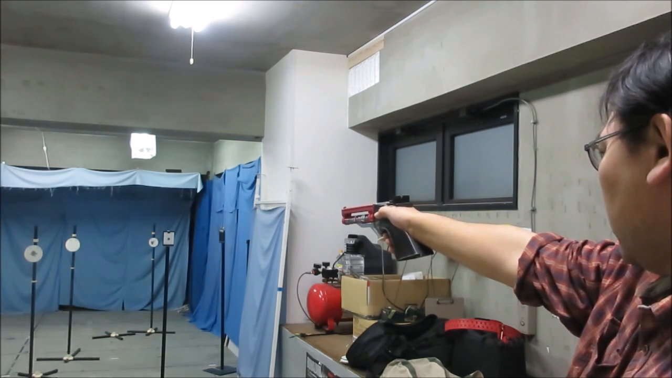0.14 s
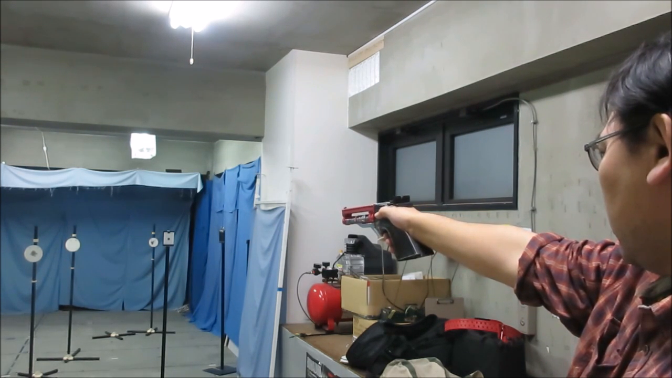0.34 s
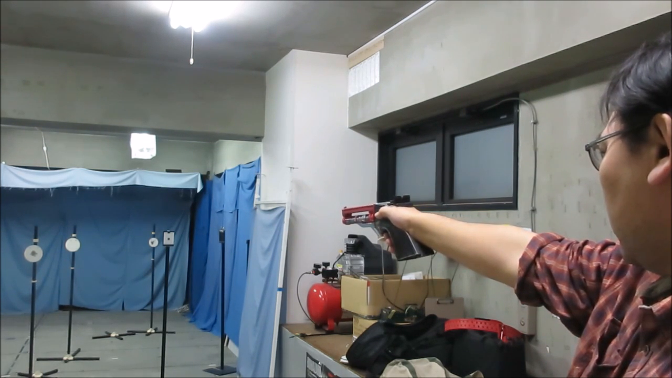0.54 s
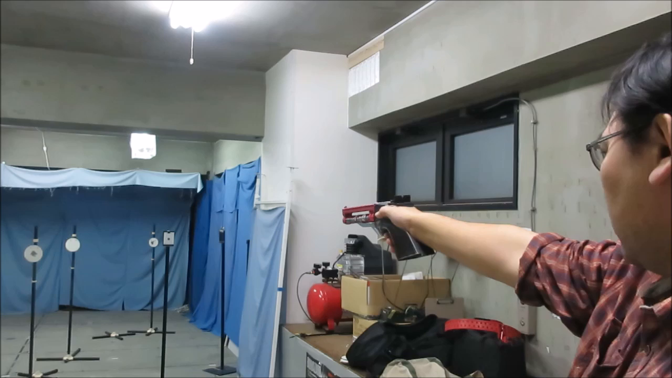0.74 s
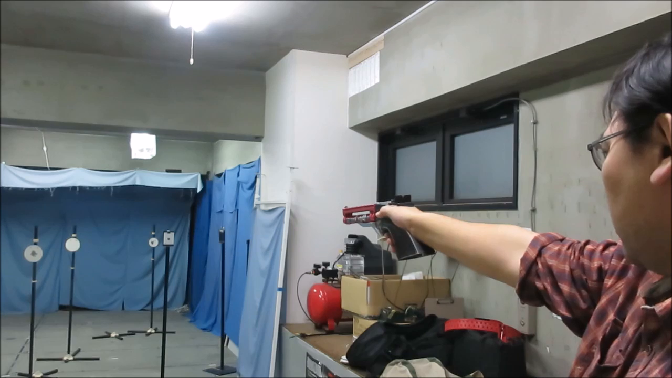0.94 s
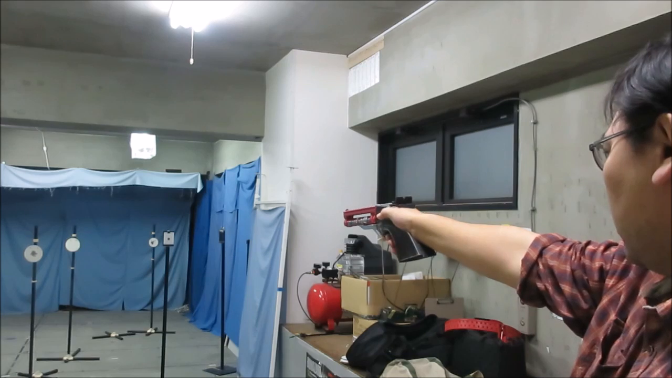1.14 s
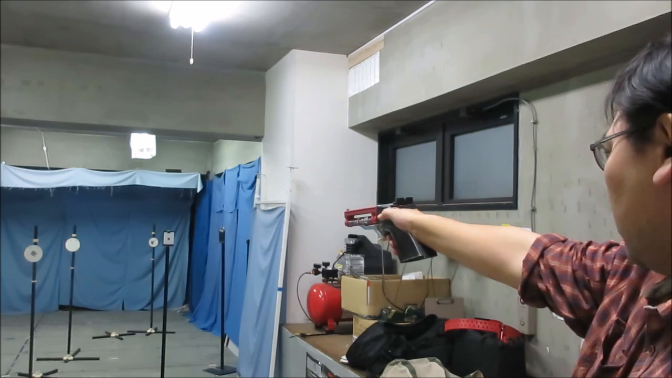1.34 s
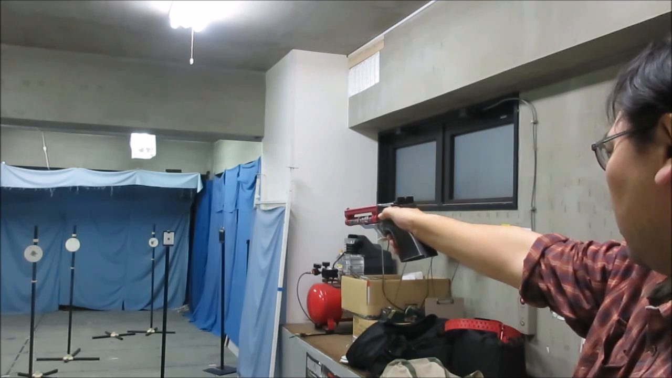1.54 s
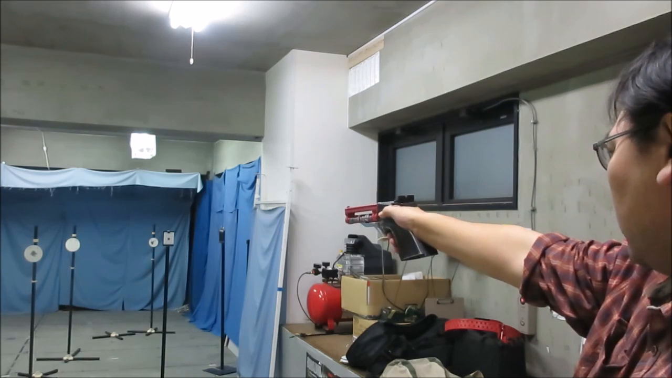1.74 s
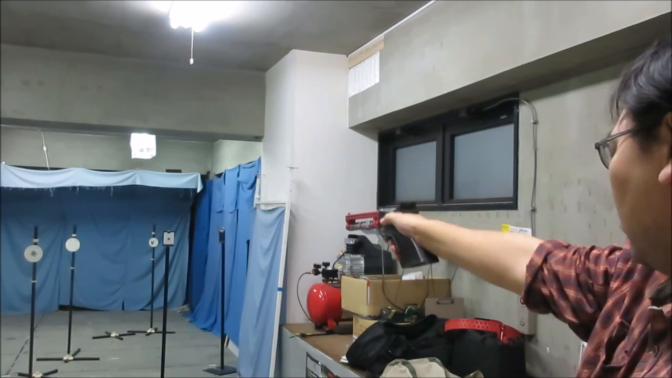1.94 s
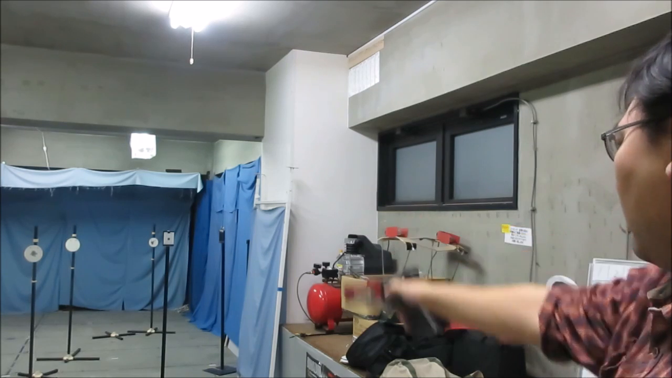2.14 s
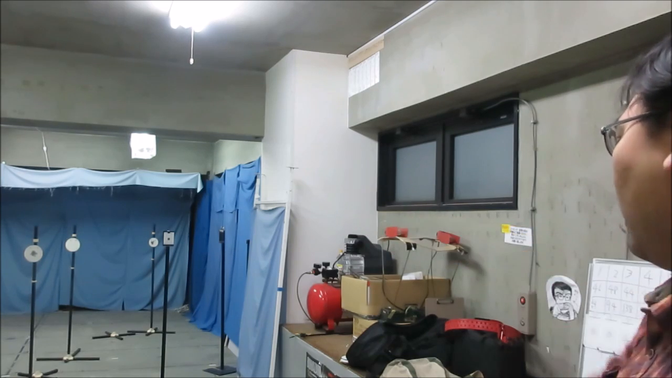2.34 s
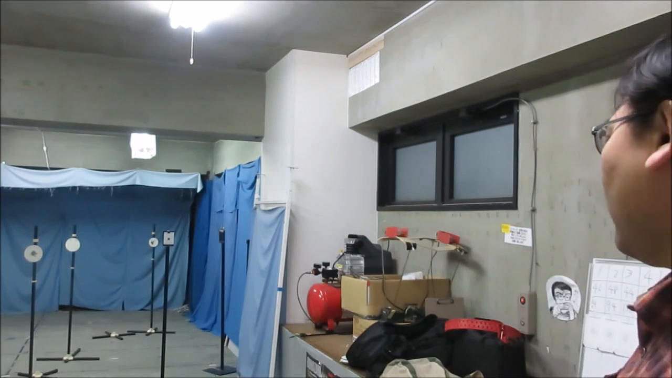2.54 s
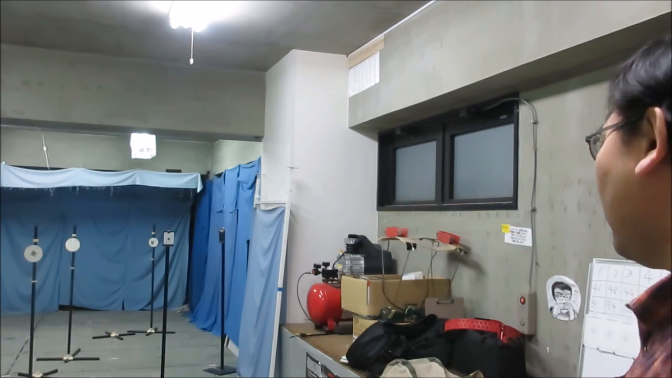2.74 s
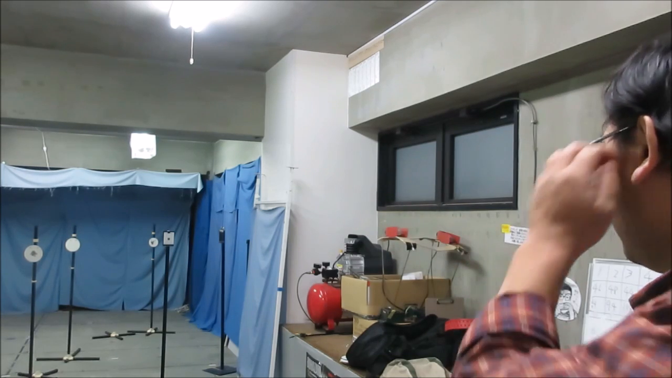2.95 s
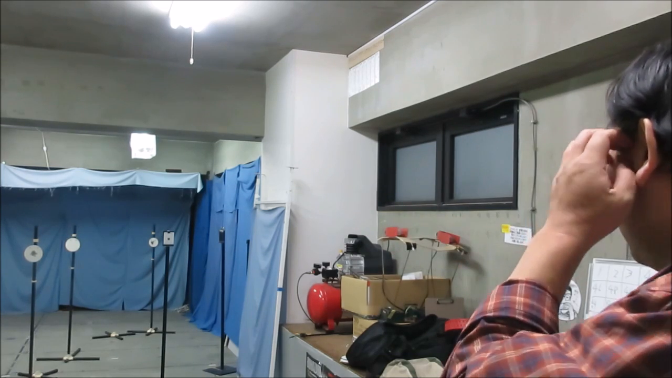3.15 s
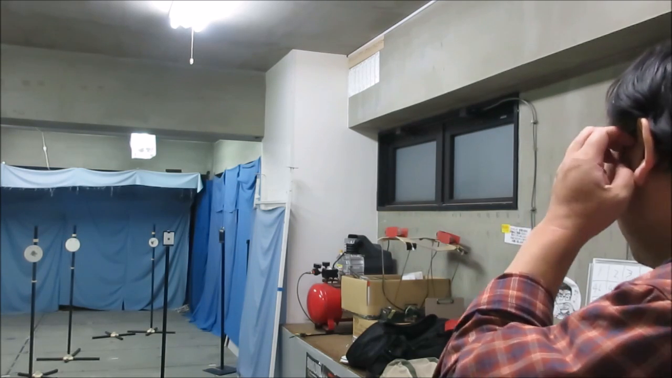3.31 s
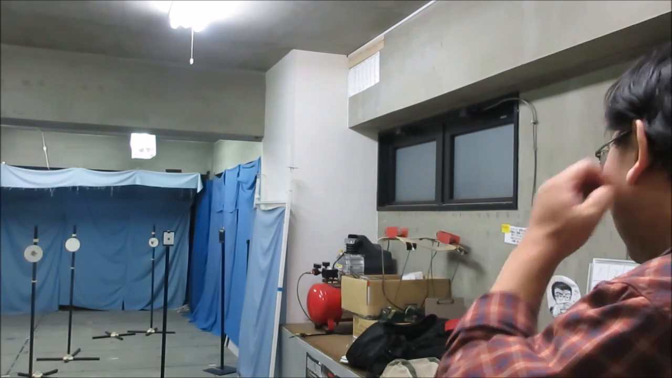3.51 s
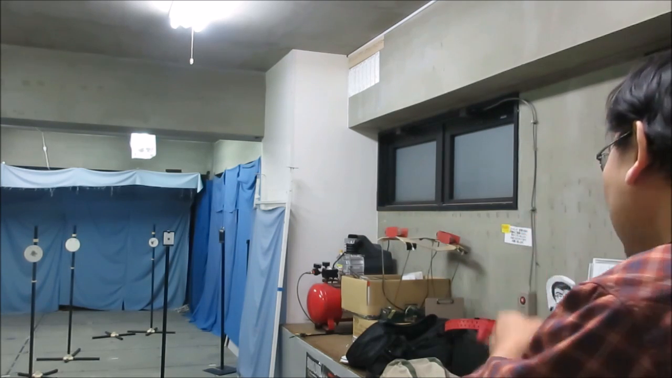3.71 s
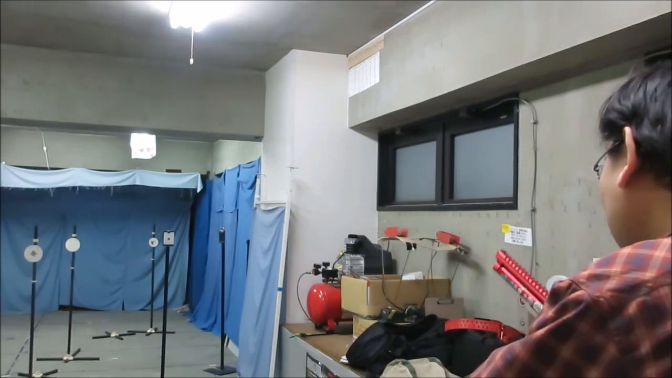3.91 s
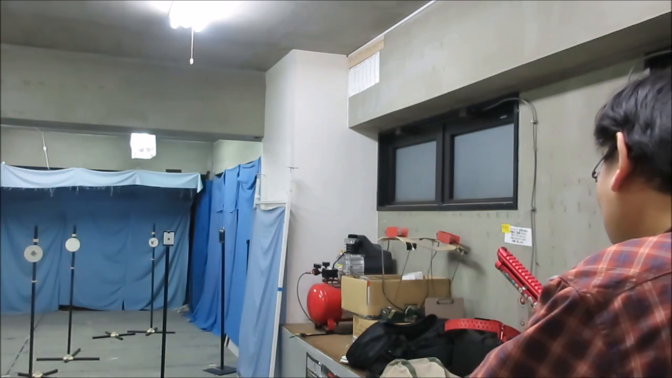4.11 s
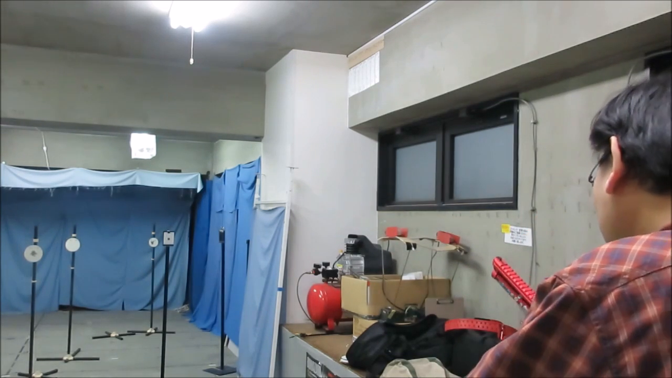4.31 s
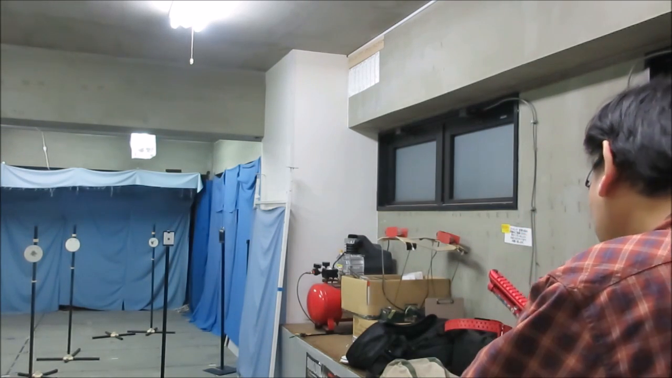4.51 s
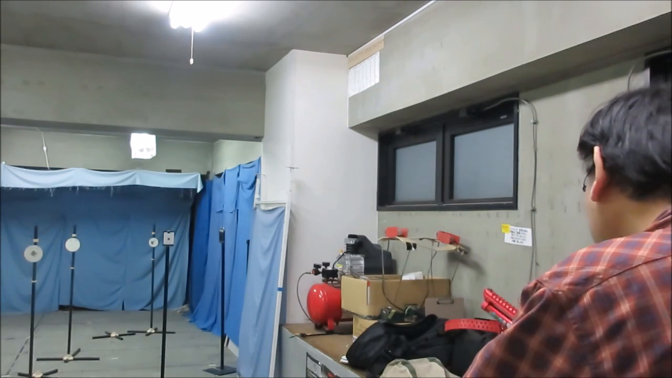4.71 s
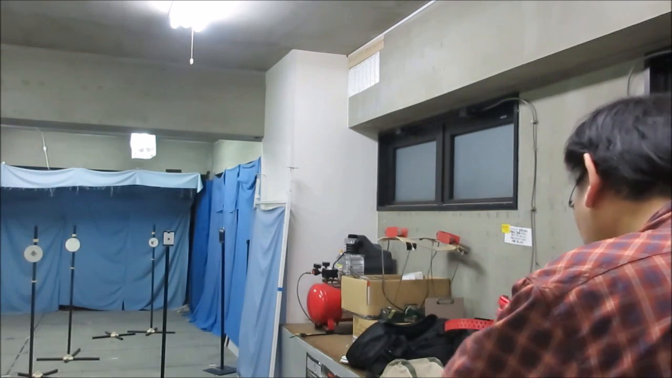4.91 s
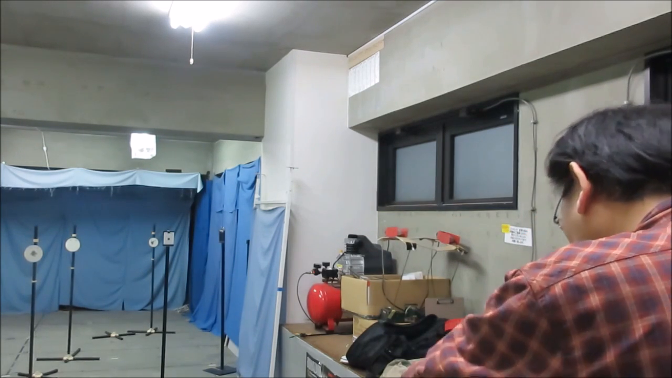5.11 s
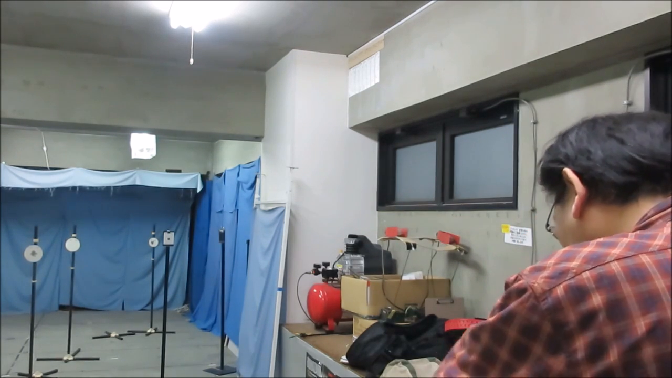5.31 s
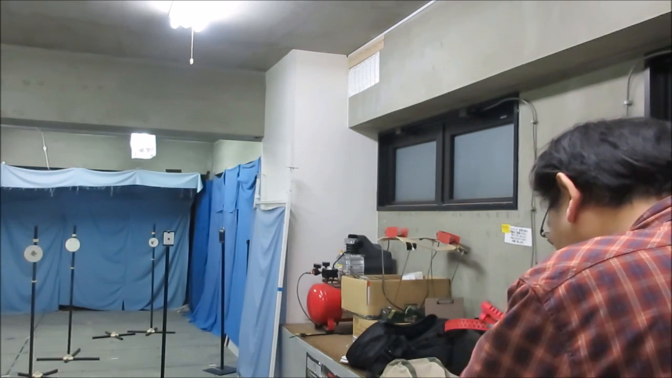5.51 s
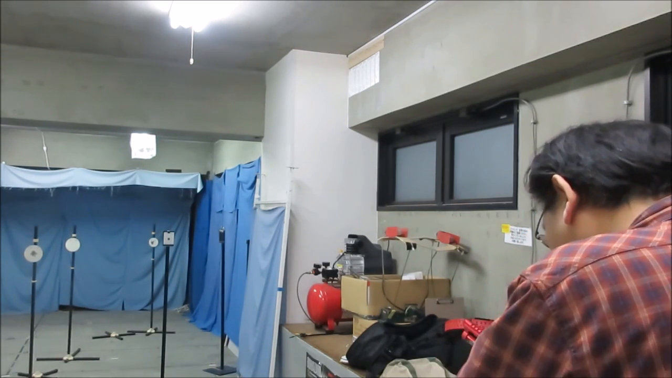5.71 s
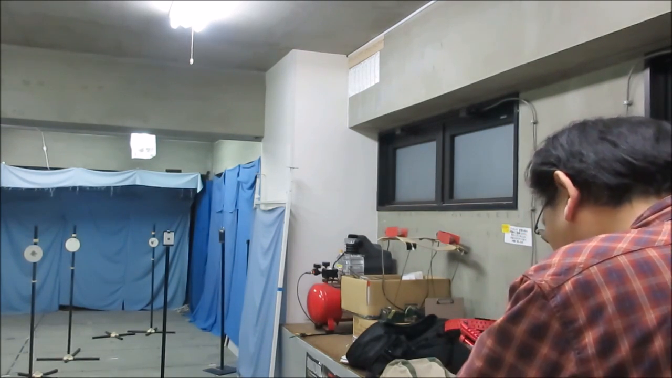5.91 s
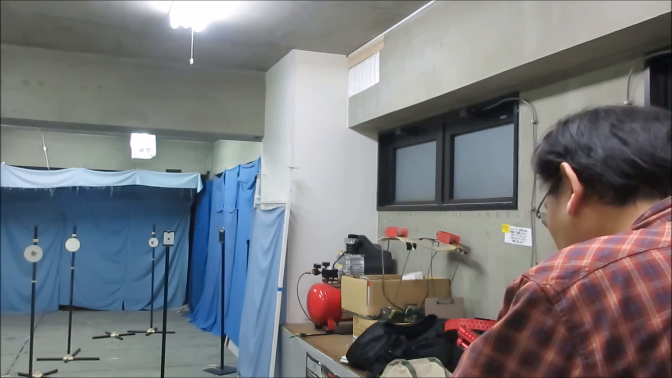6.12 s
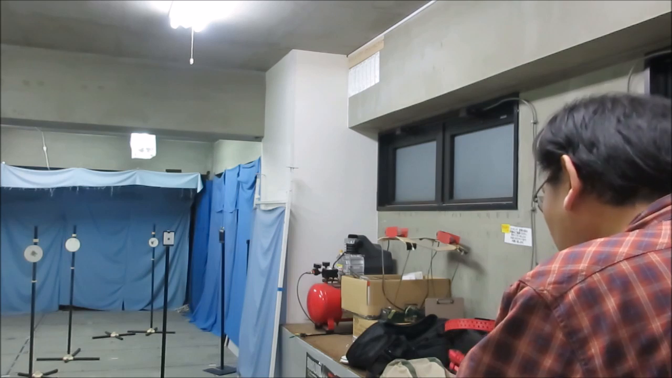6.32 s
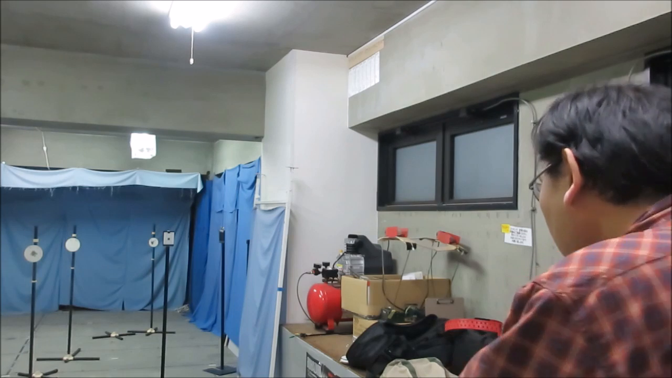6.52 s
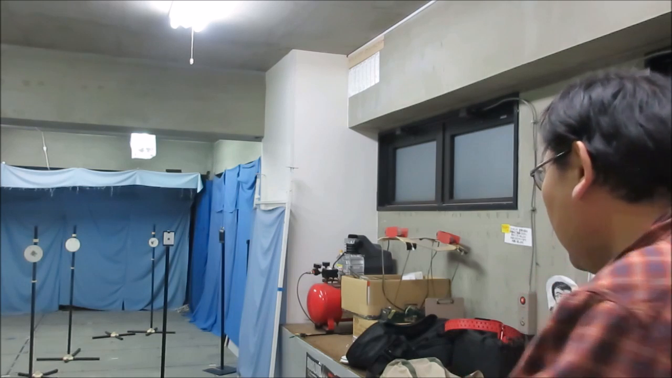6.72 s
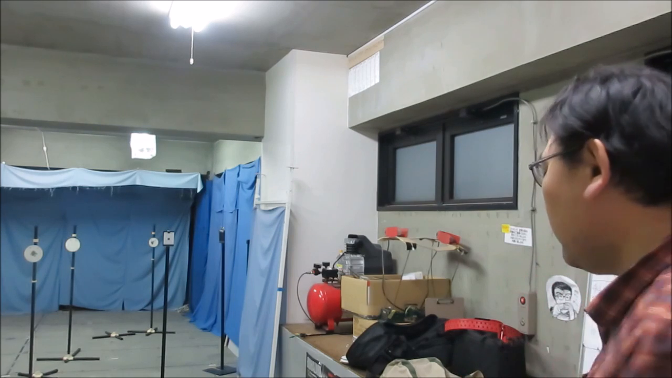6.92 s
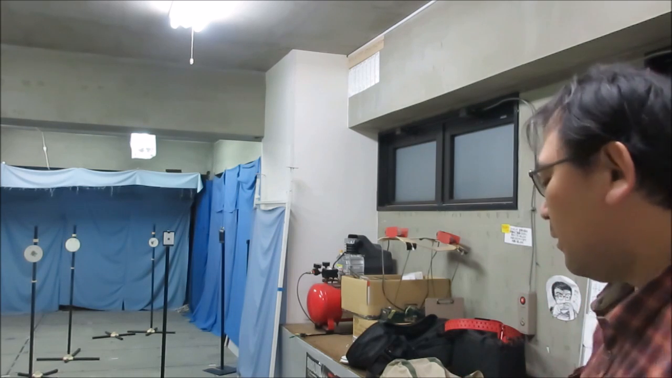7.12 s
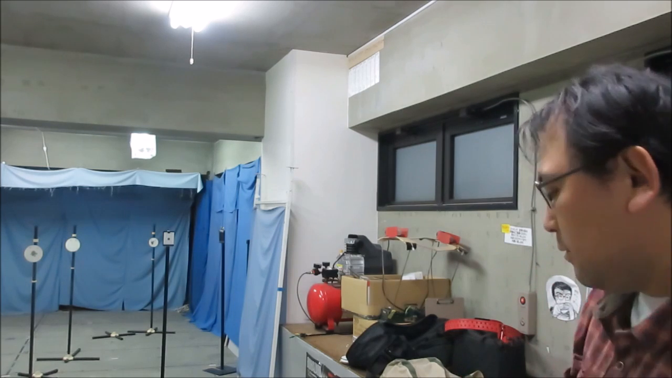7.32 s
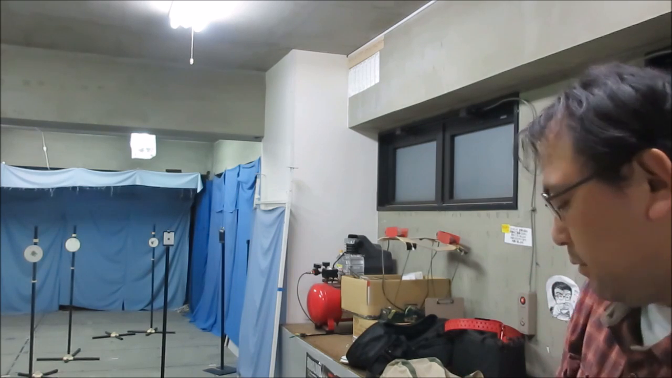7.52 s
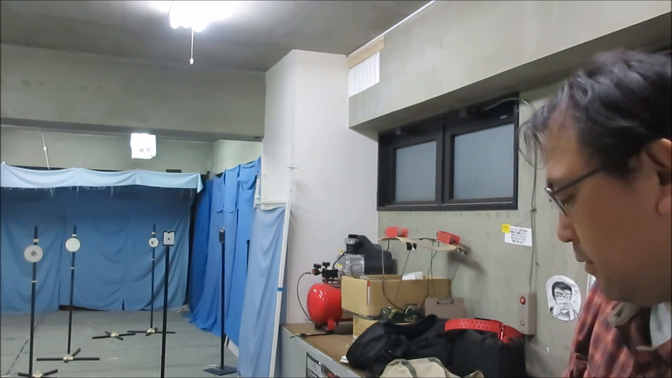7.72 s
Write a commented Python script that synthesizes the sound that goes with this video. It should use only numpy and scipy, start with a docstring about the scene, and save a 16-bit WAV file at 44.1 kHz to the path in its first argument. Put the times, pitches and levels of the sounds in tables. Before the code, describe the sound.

In a humming concrete indoor range, an air pistol cracks and a pellet clangs on steel, then small metallic clicks, a snap open and a clack shut.

```python
"""A concrete indoor range with humming ventilation: an air pistol fires, a pellet hits steel 80 ms later.
The pistol is lowered with a knock, then its action is worked: small clicks, a loud snap open, a clack shut.
Blows are decaying noise plus room echoes, coloured by a random-ribbed body; steel and hum are sines;
sleeve, lever and air are shaped noise. A gain control ducks at loud sounds and creeps back.
"""
import sys
import numpy as np
from scipy import signal
from scipy.fft import rfft, irfft, next_fast_len
from scipy.io import wavfile
from scipy.ndimage import uniform_filter1d, map_coordinates

SR = 44100
rng = np.random.default_rng(int(sys.argv[2]) if len(sys.argv) > 2 else 0)


def output_pcm(signal):
    """Save a mono or channel-first signal as 16-bit PCM at the path in sys.argv[1].

    Samples are clipped to [-1, 1] before scaling.
    """
    pcm = np.clip(np.atleast_2d(signal).T, -1, 1) * 32767
    wavfile.write(sys.argv[1], SR, np.round(pcm).astype(np.int16))


N = 341775
TIME = np.arange(N) / SR  # s
AGE = np.arange(SR * 3 // 4) / SR  # s since a blow

# Stereo width of the room. Each row: frequency in Hz, side against mid in dB.
ROOM_WIDTH = [(100, -5.5), (300, -9.5), (700, -16), (1400, -23.5), (2800, -28), (5600, -11.5),
              (10000, -6.5), (14000, 1.5)]


def amp(db):
    """Decibels to gain."""
    return 10 ** (np.asarray(db) / 20)


def unit(x):
    """Scale to rms 1."""
    return x / np.sqrt(np.mean(x ** 2) + 1e-20)


def along(points, hz):
    """Read (Hz, value) points on a log axis."""
    f, v = np.transpose(points)
    return np.interp(np.log(hz + 1), np.log(f + 1), v)


def filtered(x, response):
    """Multiply the spectrum of x by a function of frequency."""
    n = x.shape[-1]
    size = next_fast_len(n + 8192)
    spectrum = rfft(x, size) * response(np.fft.rfftfreq(size, 1 / SR))
    return irfft(spectrum, size)[..., :n]


def noise(tone):
    """Scene-long noise of rms 1 with the given spectrum."""
    return unit(filtered(rng.standard_normal(N), lambda hz: amp(along(tone, hz))))


def wobble(rate_hz):
    """Smooth random curve with rate_hz knots a second."""
    knots = rng.standard_normal(int(N * rate_hz / SR) + 4)
    return map_coordinates(knots, [TIME * rate_hz])


def fade(t60_s, t=AGE):
    """Exponential decay, 60 dB down after t60_s."""
    return np.exp(-np.log(1000) * t / t60_s)


def swell(rise_s):
    """Smooth rise to 1 at rise_s, then a slower fall."""
    return (AGE / rise_s) ** 2 * np.exp(2 - 2 * AGE / rise_s)


def stereo(mid, side, width):
    """Left and right from a middle and a coloured side signal."""
    side = filtered(side, lambda hz: amp(along(width, hz)))
    return np.array([mid + side, mid - side])


def add(track, start_s, sound):
    """Mix a sound into the track at start_s."""
    start = round(start_s * SR)
    track[:, start:start + sound.shape[-1]] += sound[..., :N - start]


def room_tail(early_db=3, early_t60_s=0.055, gap_s=0.0035):
    """Dense echoes of energy 1: near walls first, then the whole hall, each band with its own decay."""
    # Decay of the hall. Each row: frequency in Hz, t60 in seconds.
    hall_t60 = [(100, 0.12), (300, 0.32), (800, .5), (2000, 0.51), (5000, 0.47), (9000, 0.37), (15000, 0.4)]
    hz, t, bands = signal.stft(rng.standard_normal(len(AGE)), SR, nperseg=256)
    bands = bands * fade(along(hall_t60, hz)[:, None], t)
    tail = signal.istft(bands, SR, nperseg=256)[1][:len(AGE)]
    early = 1 + amp(early_db) * fade(early_t60_s)
    onset = np.clip(AGE / gap_s - 1, 0, 1)  # silent for gap_s, then a ramp
    tail = tail * early * onset
    return tail / np.linalg.norm(tail)


def body(tone, modes_db=2.5, spacing_hz=100):
    """Causal response of a hard body: its broad spectrum, ribbed by crowded random modes."""
    size = 2 * len(AGE)
    hz = np.fft.rfftfreq(size, 1 / SR)
    knots = np.tanh(np.diff(rng.standard_normal(size=1024)))  # peaks and dips tend to alternate
    ribs = map_coordinates(knots, [hz / spacing_hz], mode="wrap")
    magnitude = unit(amp(along(tone, hz) + modes_db * ribs))
    cepstrum = irfft(np.log(magnitude + 1e-9))  # folded for minimum phase
    cepstrum[1:size // 2] *= 2
    cepstrum[size // 2 + 1:] = 0
    return np.exp(rfft(cepstrum))


def coloured(x, response):
    """Pass a short sound through a body."""
    return irfft(rfft(x, 2 * len(AGE)) * response)[..., :len(AGE)]


def hit(response, t60_s, wet_db):
    """A crack that starts at rms 1 and the room's answer, both in the colour of the struck body."""
    cracks = rng.standard_normal((2, len(AGE))) * fade(t60_s)
    tails = np.array([room_tail(), room_tail()])
    echoes = amp(wet_db) * np.linalg.norm(fade(t60_s)) * tails
    return stereo(*coloured(cracks + echoes, response), ROOM_WIDTH)


def blows(rows, tone, wet_db):
    """A run of contacts on one body."""
    track, response = np.zeros((2, N)), body(tone)
    for start_s, db, t60_s in rows:
        add(track, start_s, amp(db) * hit(response, t60_s, wet_db))
    return track


def ring(modes, scatter_db=3.0):
    """Sum of decaying modes with random phases and randomly scattered levels."""
    total = 0
    for hz, db, t60_s in modes:
        level = amp(db + scatter_db * rng.standard_normal())
        total = total + level * fade(t60_s) * np.sin(2 * np.pi * (hz * AGE + rng.random()))
    return total


def ventilation(air_db=-49.5, waver_db=0.8, drift_cycles=0.023, shaft_hz=21.03, mains_hz=50):
    """Shaft harmonics and mains lines, slightly unsteady in level and phase, over rushing air."""
    # Machine hum. Each row: multiple of the shaft speed, mean peak level in dB.
    shaft_lines = [(5, -60), (6, -47), (9, -69), (10, -52), (11, -50), (12, -57), (13, -61), (14, -52.5),
                   (15, -55.5), (17, -63.5), (18, -62), (20, -61)]
    # Electrical hum. Each row: multiple of the mains frequency, mean peak level in dB.
    mains_lines = [(1, -60.5), (14, -64), (16, -66.5)]
    # Spectrum of the air. Each row: frequency in Hz, relative density in dB per Hz.
    air_tone = [(20, -14.5), (45, -2), (75, -5.5), (150, 0), (300, 3), (400, -3), (520, -7.5), (900, -6),
                (1500, -13), (3000, -20), (6000, -27), (10000, -34.5), (15000, -43)]
    # Stereo width of the air. Each row: frequency in Hz, side against mid in dB.
    air_width = [(60, -13.5), (150, -11.5), (380, -7.5), (950, -8.5), (2380, -9.5), (5980, -7),
                 (15000, -13)]
    lines = [(k * shaft_hz, db) for k, db in shaft_lines] + [(k * mains_hz, db) for k, db in mains_lines]
    hum = 0
    for hz, db in lines:
        level = amp(db + waver_db * wobble(1.7))
        cycles = hz * TIME + rng.random() + drift_cycles * wobble(1.8)
        hum = hum + level * np.sin(2 * np.pi * cycles)
    return hum + amp(air_db) * stereo(noise(air_tone), noise(air_tone), air_width)


def blast():
    """The striker's tick, the muzzle blast and its slaps off the nearest walls, as bursts of noise."""
    # Each row: start in seconds, level in dB, t60 in seconds.
    blast_rows = [(1.0384, -14, 0.0055), (1.0412, 18.5, 0.032), (1.0449, 21.5, 0.01), (1.0484, 12.5, 0.018)]
    # Each row: frequency in Hz, relative density in dB per Hz.
    blast_tone = [(40, -29), (130, -11.5), (340, -1), (620, -2.5), (820, -5), (1220, -6), (1440, 2),
                  (1750, -8.5), (2400, 1), (4200, -2), (6500, -8.5), (9500, -15.5), (14500, -27.5),
                  (16000, -30)]
    return blows(blast_rows, blast_tone, wet_db=-4.5)


def pops():
    """Low pops just after the shot reach the two microphone ports one after the other."""
    # Each row: start in seconds, peak before the high-pass in dB, length in s, lag of the right port in s.
    pop_rows = [(1.1197, 6.5, .0013, .0006), (1.1387, 11, 0.0016, .0016)]
    track = np.zeros((2, N))
    for start_s, db, length_s, lag_s in pop_rows:
        u = np.maximum(AGE - np.array([[0], [lag_s]]), 0) / length_s
        push = (u - 1) * np.exp(-u) * (1 - np.exp(-u))
        add(track, start_s, amp(db) * push / np.abs(push).max())
    return filtered(track, lambda hz: 1j * hz / (1j * hz + 60))  # the ports leak the deepest bass


def target(ring_db=-1, clang_db=-3, clang_t60_s=0.3, attack_s=0.002):
    """The pellet cracks against the steel plate, which rings on in separate and crowded modes."""
    # Pellet contacts. Each row: start in seconds, level in dB, t60 in seconds.
    impact_rows = [(1.1206, 21, 0.029), (1.1228, 17, .025)]
    # Spectrum of the contacts. Each row: frequency in Hz, relative density in dB per Hz.
    impact_tone = [(59, -42.5), (100, -18.5), (1150, -22), (1870, -1.5), (2320, -9.5), (2990, -14.5),
                   (3250, -10.5), (4980, -12), (5650, -18), (7770, -19.5), (16000, -42)]
    # Modes of the plate. Each row: frequency in Hz, relative level in dB, t60 in seconds.
    plate_modes = [(730, -32, 1), (1620, -13.5, 0.57), (1680, -12.5, 0.54), (1857, -6, 0.66),
                   (1900, -6, 0.55), (2121, -9.5, 0.55), (2490, -17.5, .6), (2600, -24, 0.95),
                   (3280, -21, 0.4), (4100, -19, .56), (5050, -22, .58), (7120, -28, .45)]
    # Crowded low modes. Each row: frequency in Hz, relative density in dB per Hz.
    clang_tone = [(1000, -32.5), (1380, -16.5), (1580, -1.5), (1840, 3), (2150, -3), (2800, -12.5), (5000, -34)]
    track = blows(impact_rows, impact_tone, wet_db=-7.5)
    plate = amp(ring_db) * ring(plate_modes, scatter_db=0)
    clang = amp(clang_db) * hit(body(clang_tone), clang_t60_s, wet_db=-6)
    add(track, impact_rows[0][0], (clang + plate) * (1 - np.exp(-AGE / attack_s)))
    return track


def sleeve(rough_db=1.5):
    """Cloth rubs unevenly, swelling and fading with each arm movement."""
    # Arm movements. Each row: middle in seconds, length in seconds, typical level in dB.
    stroke_rows = [(2.276, 0.22, -53.5), (2.55, 0.41, -48.5), (2.942, .22, -56), (4.05, 1.5, -58),
                   (6.913, 0.47, -51.5), (7.379, 0.24, -49), (7.657, 0.33, -49.5)]
    # Spectrum of the rubbing. Each row: frequency in Hz, relative density in dB per Hz.
    cloth_tone = [(150, -5), (400, 1.5), (900, 1), (1500, -4), (3000, -8.5), (7000, -26), (14000, -43)]
    strokes = sum(amp(db) * np.exp(-(2 * (TIME - mid_s) / length_s) ** 2)
                  for mid_s, length_s, db in stroke_rows)
    rub = stereo(noise(cloth_tone), noise(cloth_tone), ROOM_WIDTH)
    return strokes * amp(rough_db * wobble(35)) * rub


def knocks():
    """Dull contacts as the pistol is lowered and the shooter turns."""
    # Each row: start in seconds, level in dB, t60 in seconds.
    knock_rows = [(2.244, -41.5, .06), (2.3868, -9, 0.0092), (2.3935, -17.5, 0.023), (2.578, -43, 0.089),
                  (2.66, -43.5, 0.044), (7.654, -39, 0.016)]
    # Each row: frequency in Hz, relative density in dB per Hz.
    knock_tone = [(80, -21), (170, -4.5), (330, -1.5), (800, -2), (1350, -4.5), (1900, -7.5), (3000, -13.5),
                  (4500, -19.5), (7000, -32.5), (10000, -39), (14000, -49)]
    return blows(knock_rows, knock_tone, wet_db=2)


def hollow(start_s=2.545, note_hz=920, db=-43, rise_s=0.051, blur_cycles=0.16):
    """A soft hollow note, blurred in phase, swells and dies away as the pistol comes to rest."""
    track = np.zeros((2, N))
    cycles_blurred = note_hz * AGE * 2 * np.pi + 2 * np.pi * blur_cycles * wobble(48)[:len(AGE)]
    add(track, start_s, amp(db) * swell(rise_s) * np.sin(cycles_blurred))
    return track


def glasses():
    """The shooter's glasses tick under his hand: short bright contacts."""
    # Each row: start in seconds, level in dB, t60 in seconds.
    glass_rows = [(2.776, -53, 0.011), (2.783, -50, 0.011), (2.918, -51, 0.011)]
    # Each row: frequency in Hz, relative density in dB per Hz.
    glass_tone = [(2000, -28), (6000, 0), (9000, -2), (15500, -7)]
    return blows(glass_rows, glass_tone, wet_db=-4)


def bump(start_s=3.913, db=-29, rest_hz=118, glide_hz=80, glide_s=0.012, rise_s=0.027):
    """A soft thump, a sine falling in pitch, as the pistol is taken in both hands."""
    track = np.zeros((2, N))
    pitch_hz = rest_hz + glide_hz * np.exp(-AGE / glide_s)
    phase = 2 * np.pi * np.cumsum(pitch_hz) / SR
    add(track, start_s, amp(db) * swell(rise_s) * np.sin(phase))
    return track


def grain(depth_db=5.0, rate_hz=600):
    """A gain of rms 1 that breaks a slide into tiny ticks."""
    return unit(amp(depth_db * np.tanh(wobble(rate_hz)[:len(AGE)])))


def clicks(ring_width=0.16, slide_t60_s=0.052, wet_db=-0.5, touch_t60_s=0.023,
           seat_delay_s=0.0051, seat_t60_s=0.024, seat_bright_db=4,
           bounce_delay_s=0.023, bounce_loss_db=15.5, bounce_t60_s=0.056):
    """Each small part slides, touches its stop, seats brighter and bounces, with a broad resonance of its own."""
    # Parts of the action. Each row: touch time in seconds, slide level in dB, touch level in dB,
    # seating level in dB, resonance in Hz, its height in dB, brightness in dB per octave.
    click_rows = [(4.32, -58, -45, -45.5, 5030, 9, -4), (4.405, -36, -28.5, -29.5, 2590, 1.5, -2),
                  (4.475, -31, -24.5, -18, 4400, 2, 1.5), (4.615, -41, -36.5, -33.5, 2840, 11, -5),
                  (4.8153, -34.5, -26, -25, 3500, 3, -1.5), (4.9025, -48, -27, -34, 2080, 10, -4.5),
                  (5.127, -53, -31, -28, 4070, 3.5, -4.5), (5.292, -58, -42, -44, 3180, 15, -9),
                  (5.3276, -41, -24, -28.5, 3030, 7.5, -5), (5.742, -52, -45, -46, 2190, 15, -10),
                  (6.393, -54, -35.5, -30, 2290, 8, -3.5)]
    # Spectrum common to the parts. Each row: frequency in Hz, relative density in dB per Hz.
    click_tone = [(500, -23), (1000, -5.5), (1400, -3), (2000, 4), (3000, 2), (4400, 2), (6500, -1),
                  (9000, -8), (12400, -18.5), (16000, -29)]
    # Ringing steel of the action. Each row: frequency in Hz, mean level against the touch in dB, t60 in s.
    action_modes = [(2220, -22, 0.38), (2650, -19, .25), (3350, -24.5, 0.34), (3840, -32, .4),
                    (4435, -25, 0.2), (6400, -35, 0.16), (6850, -23, 0.2)]
    track = np.zeros((2, N))
    grid_hz = np.geomspace(100, SR / 2, num=120)
    slide = grain() * fade(slide_t60_s)[::-1]  # swells up to the touch
    for touch_s, slide_db, touch_db, seat_db, peak_hz, peak_db, bright_db in click_rows:
        peak = peak_db / (1 + (np.log(grid_hz / peak_hz) / ring_width) ** 2)
        tone = along(click_tone, grid_hz) + peak
        octaves = np.log2(grid_hz)
        loose = body(np.transpose([grid_hz, tone + bright_db * octaves]))
        seated = body(np.transpose([grid_hz, tone + (bright_db + seat_bright_db) * octaves]))
        scrape = coloured(rng.standard_normal(len(AGE)) * slide, loose)
        touch = hit(loose, touch_t60_s, wet_db) + ring(action_modes)
        add(track, touch_s - AGE[-1], amp(slide_db) * scrape)
        add(track, touch_s, amp(touch_db) * touch)
        add(track, touch_s + seat_delay_s, amp(seat_db) * hit(seated, seat_t60_s, wet_db))
        bounce = hit(loose, bounce_t60_s, wet_db)
        add(track, touch_s + bounce_delay_s, amp(seat_db - bounce_loss_db) * bounce)
    return track


def snap():
    """The action springs open in a quick run of contacts."""
    # Each row: start in seconds, level in dB, t60 in seconds.
    snap_rows = [(5.9995, -26, 0.036), (6.005, -23, 0.023), (6.009, -10, 0.027), (6.0142, -10.5, 0.029),
                 (6.029, -16, 0.011)]
    # Each row: frequency in Hz, relative density in dB per Hz.
    snap_tone = [(180, -43), (300, -20), (584, -13.5), (814, -3), (870, -4.5), (1150, -4), (1210, -7),
                 (2140, -2), (2440, -3.5), (2980, -2), (5430, -3.5), (7320, -9), (9090, -9), (14700, -33),
                 (16000, -39)]
    return blows(snap_rows, snap_tone, wet_db=0.0)


def lever(start_s=6.408, length_s=0.078, db=-41.5, attack_s=0.0027, release_t60_s=0.15, rough_db=5.0):
    """Metal rubs unevenly on metal while the lever swings home."""
    # Each row: frequency in Hz, relative density in dB per Hz.
    rub_tone = [(500, -28), (1500, 2), (2500, -4), (6000, -1), (9000, -13), (16000, -20)]
    t = np.maximum(TIME - start_s, 0)
    stroke = (1 - np.exp(-t / attack_s)) * fade(release_t60_s, np.maximum(t - length_s, 0))
    rub = stereo(noise(rub_tone), noise(rub_tone), ROOM_WIDTH)
    return amp(db + rough_db * wobble(150)) * stroke * rub


def clack():
    """The lever claps shut in a few contacts."""
    # Each row: start in seconds, level in dB, t60 in seconds.
    clack_rows = [(6.4815, -9.5, 0.0071), (6.4866, -10.5, 0.027), (6.491, -20, 0.016)]
    # Each row: frequency in Hz, relative density in dB per Hz.
    clack_tone = [(240, -46), (400, -26), (655, -20), (730, -21), (921, -23), (1030, -12), (1310, -6.5),
                  (1840, 0.5), (3310, -14), (7750, -18.5), (13500, -33.5), (15300, -41), (16000, -57)]
    return blows(clack_rows, clack_tone, wet_db=0.0)


def scene():
    """Shot, target, handling and the humming room."""
    shot = blast() + pops() + target()
    handling = sleeve() + knocks() + hollow() + glasses() + bump()
    action = clicks() + snap() + lever() + clack()
    return ventilation() + shot + handling + action


def record(dry, limit_db=-6.5, range_db=21, recovery_db_per_s=10, ceiling=1.05, top_hz=15900):
    """Gain control ducks at once, within its range, and creeps back; peaks clip softly; the top band is cut."""
    power = np.abs(uniform_filter1d(np.mean(dry ** 2, axis=0), size=128))
    excess_db = np.clip(10 * np.log10(power + 1e-12) - limit_db, 0, range_db)
    recovered_db = recovery_db_per_s * TIME
    duck_db = np.maximum.accumulate(excess_db + recovered_db) - recovered_db
    ducked = dry * amp(-duck_db)
    clipped = ducked / (1 + np.abs(ducked / ceiling) ** 6) ** (1 / 6)
    return filtered(clipped, lambda hz: 1 / (1 + (hz / top_hz) ** 80))


dry = scene()
out = record(dry)
output_pcm(out)
```